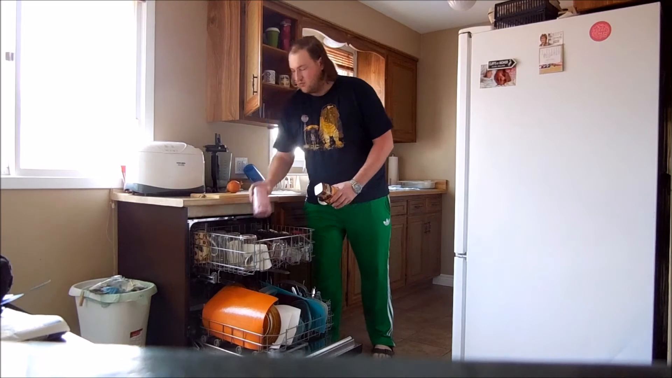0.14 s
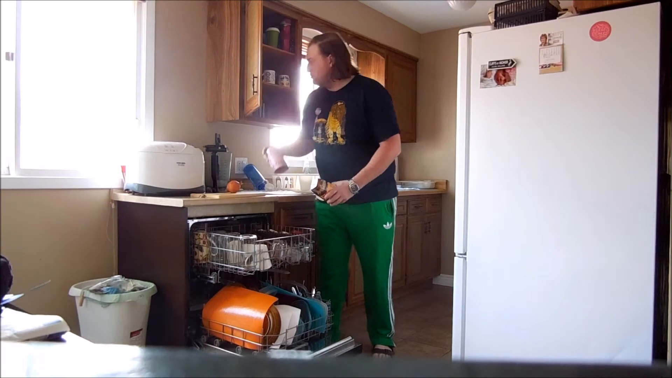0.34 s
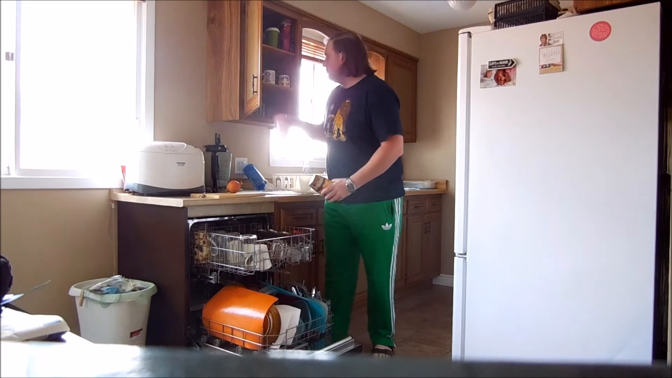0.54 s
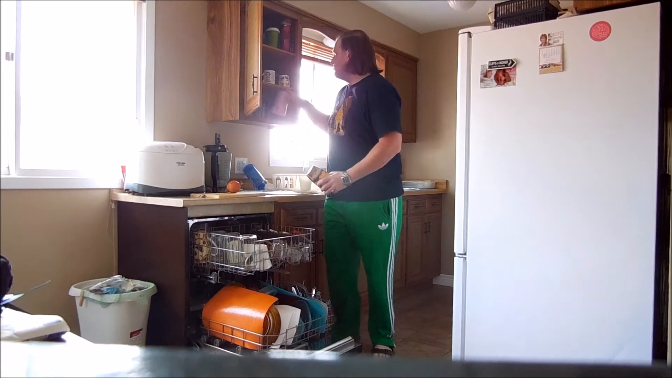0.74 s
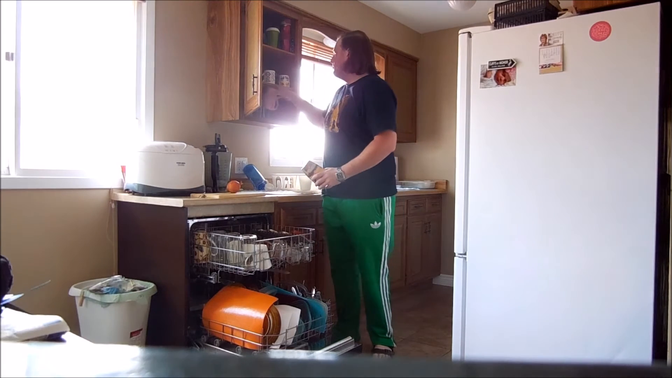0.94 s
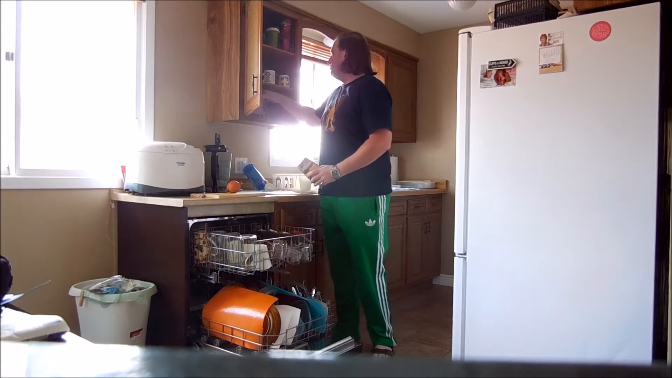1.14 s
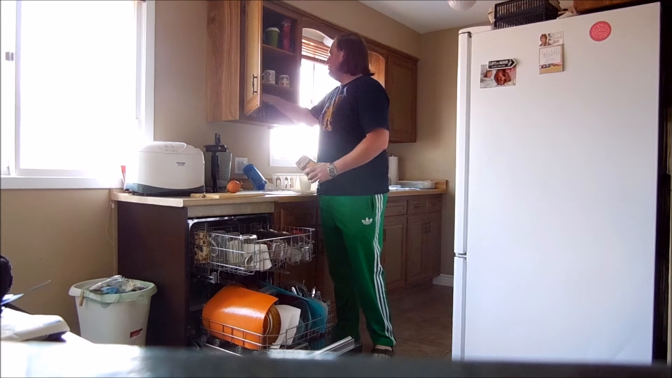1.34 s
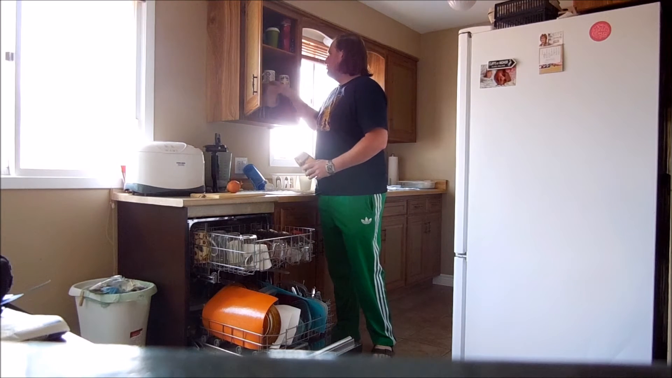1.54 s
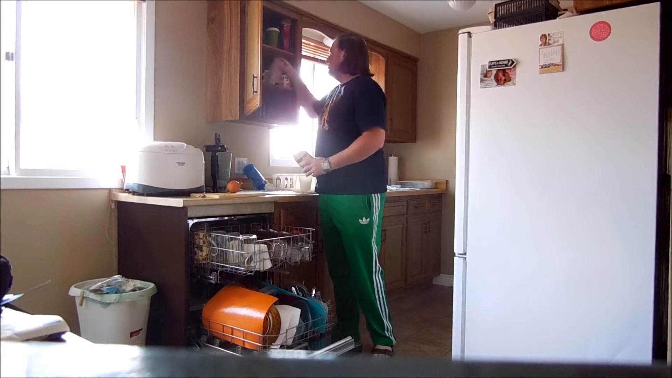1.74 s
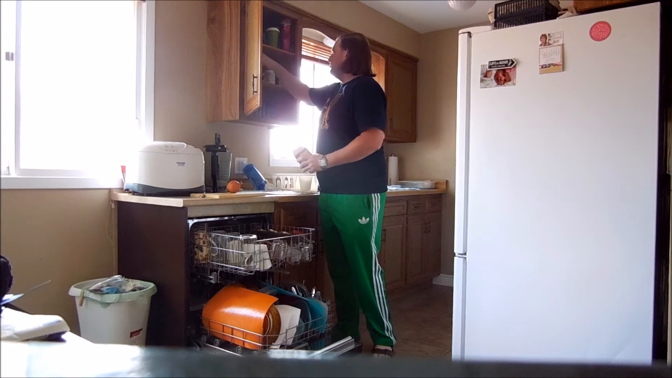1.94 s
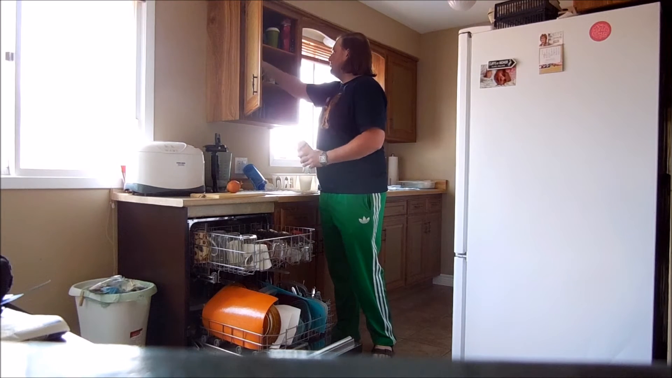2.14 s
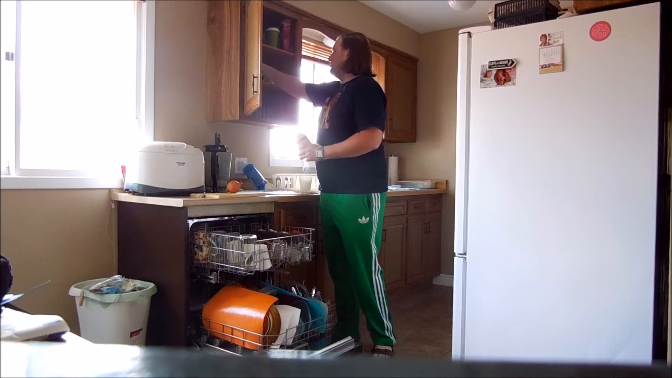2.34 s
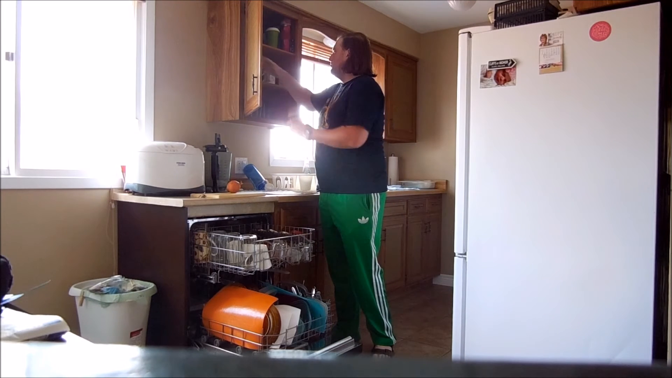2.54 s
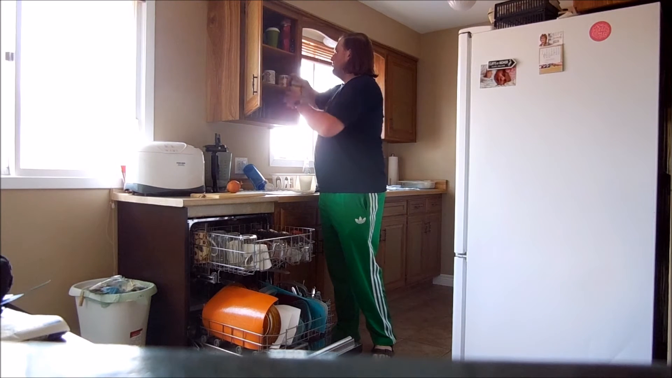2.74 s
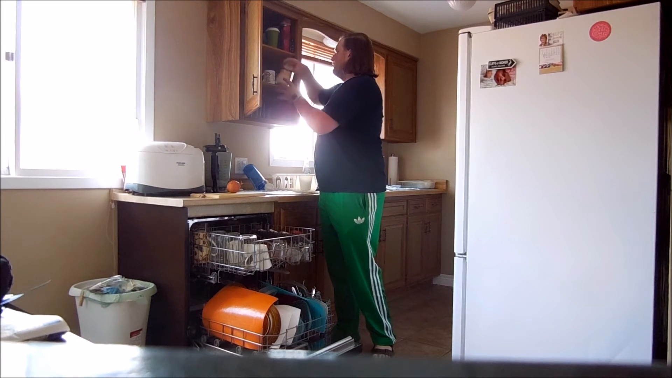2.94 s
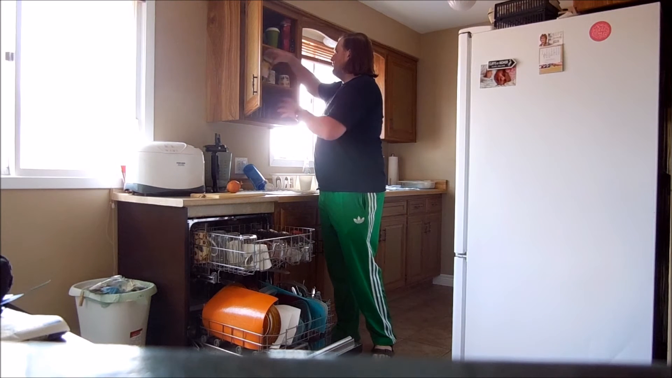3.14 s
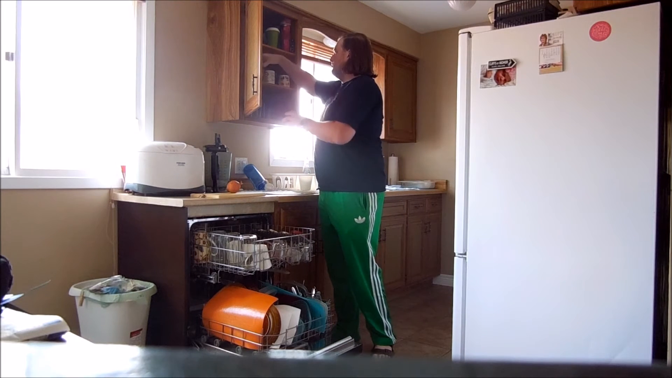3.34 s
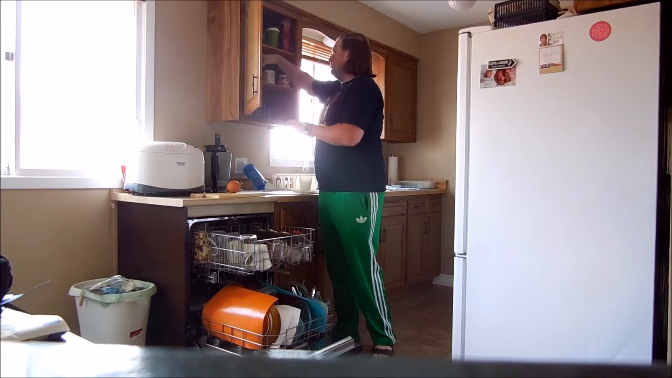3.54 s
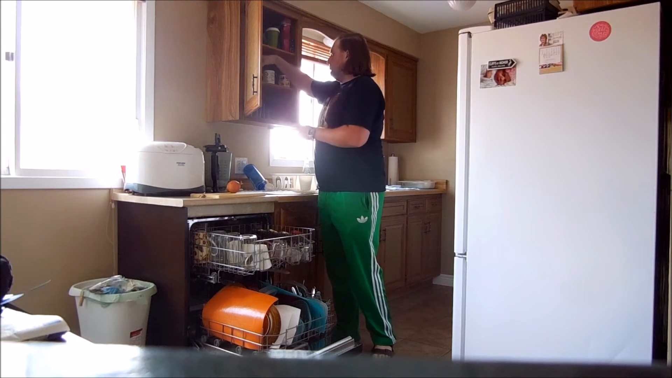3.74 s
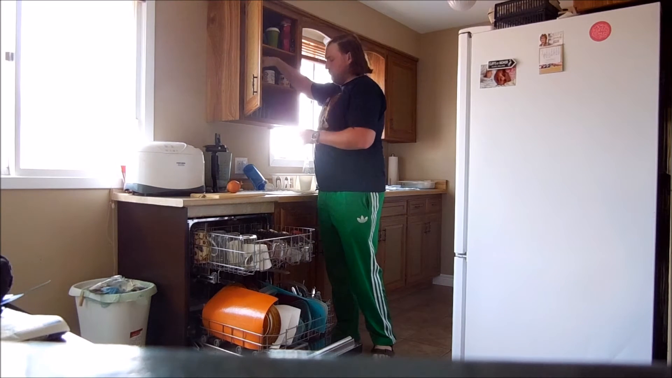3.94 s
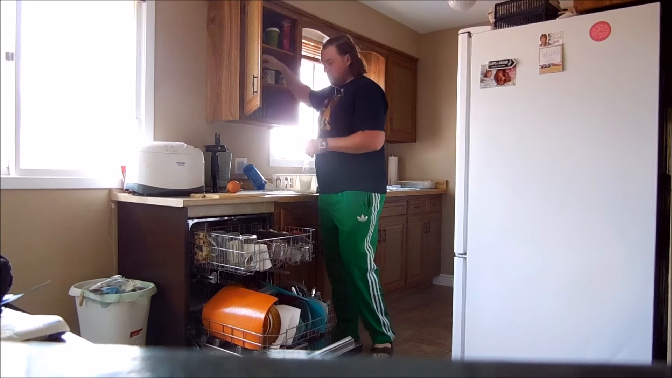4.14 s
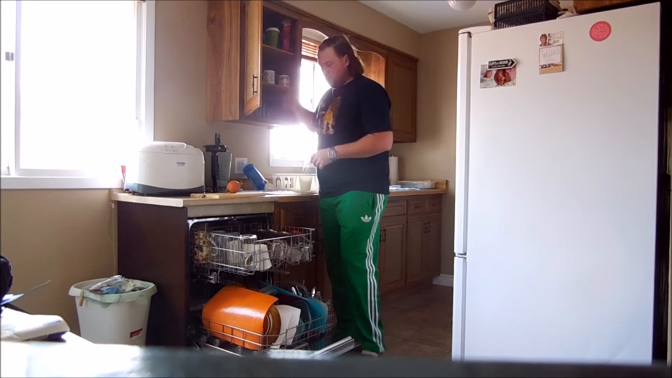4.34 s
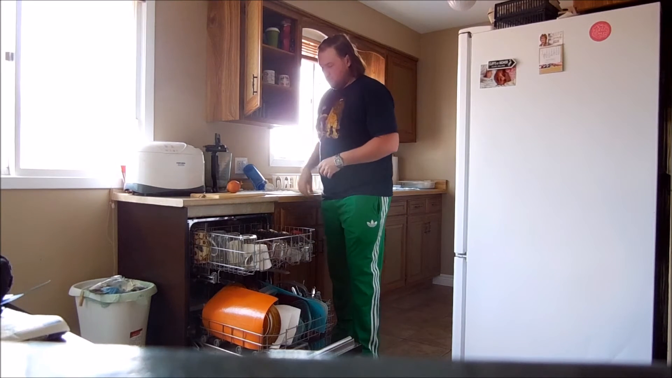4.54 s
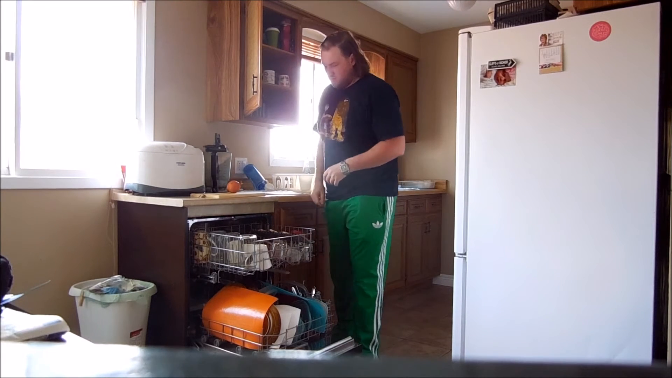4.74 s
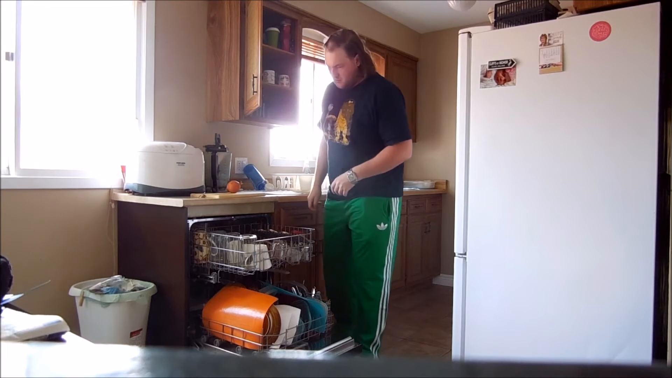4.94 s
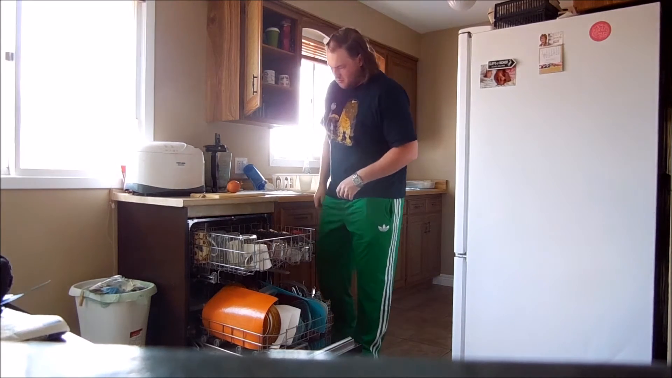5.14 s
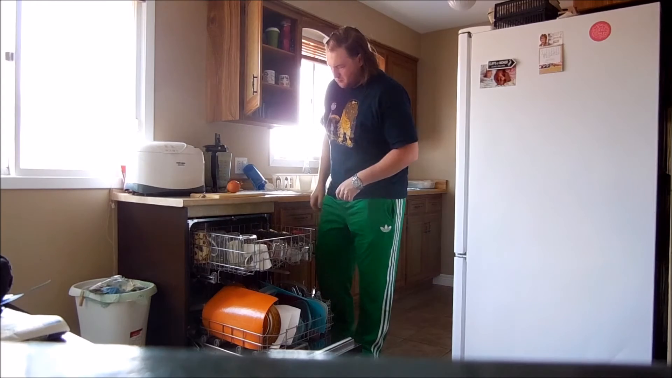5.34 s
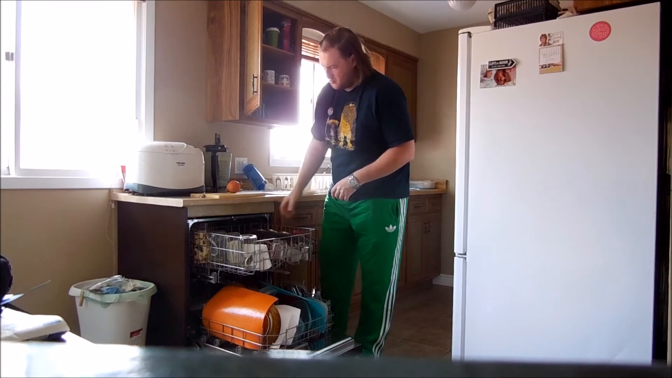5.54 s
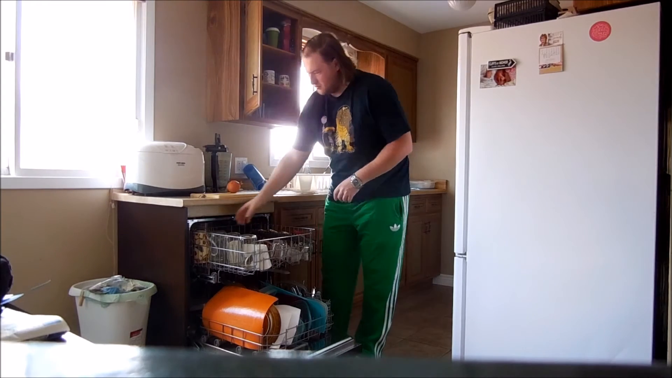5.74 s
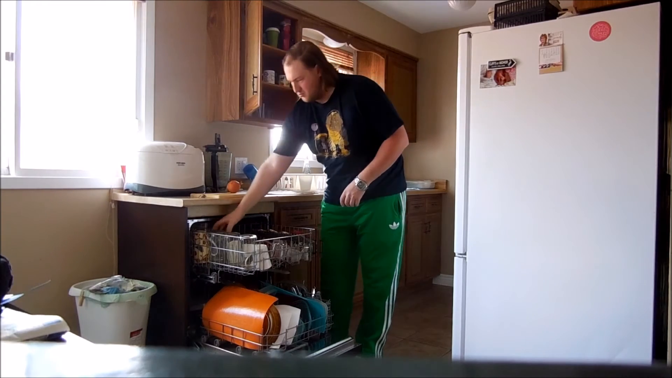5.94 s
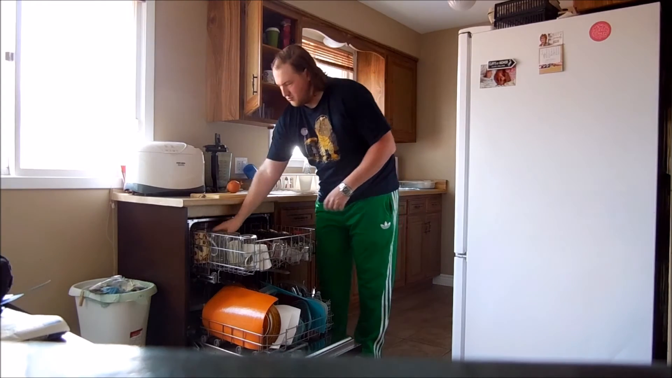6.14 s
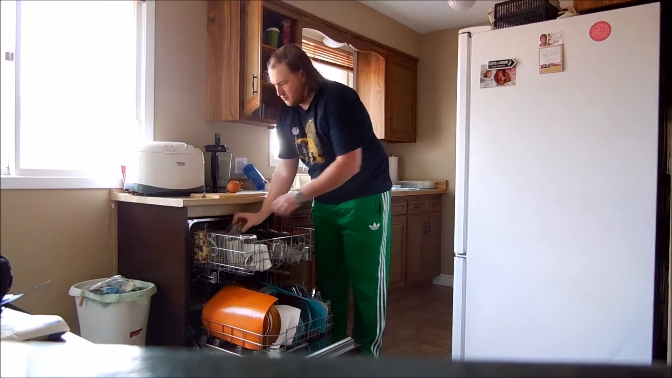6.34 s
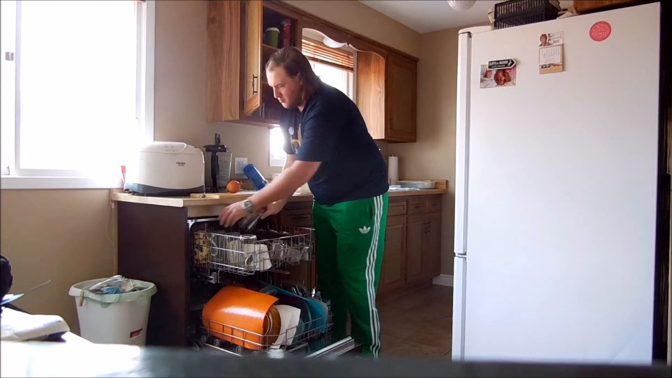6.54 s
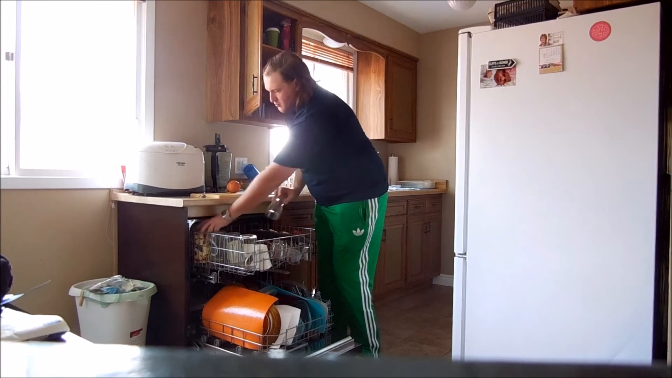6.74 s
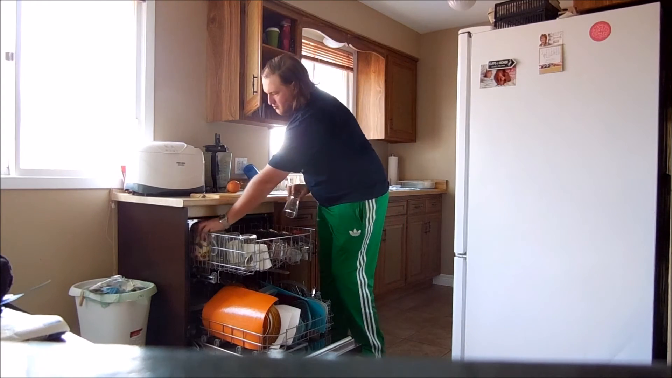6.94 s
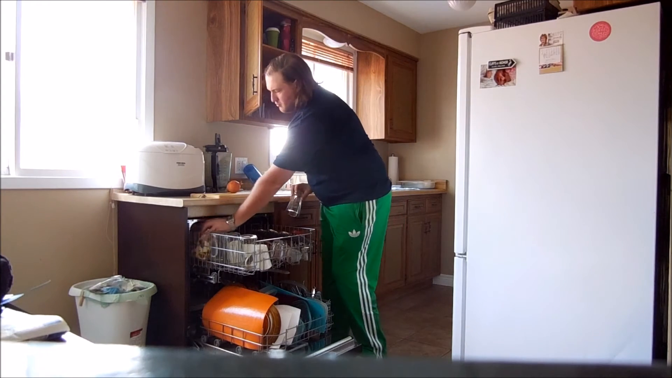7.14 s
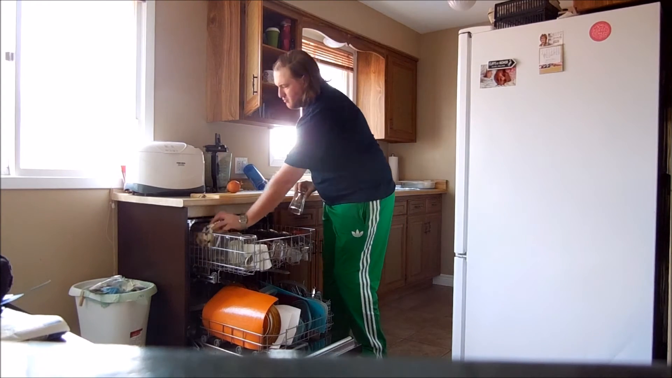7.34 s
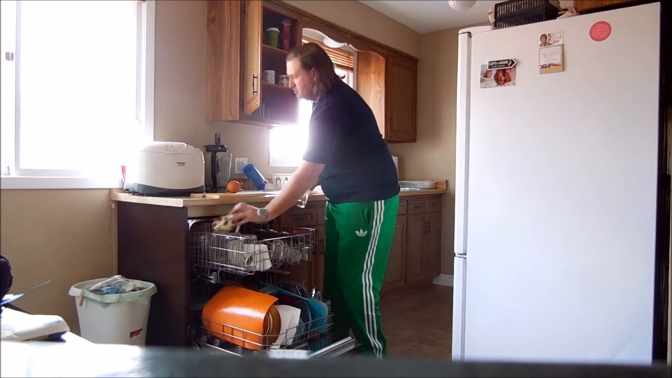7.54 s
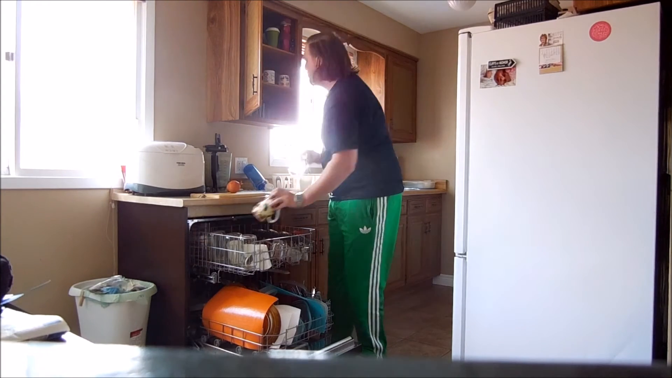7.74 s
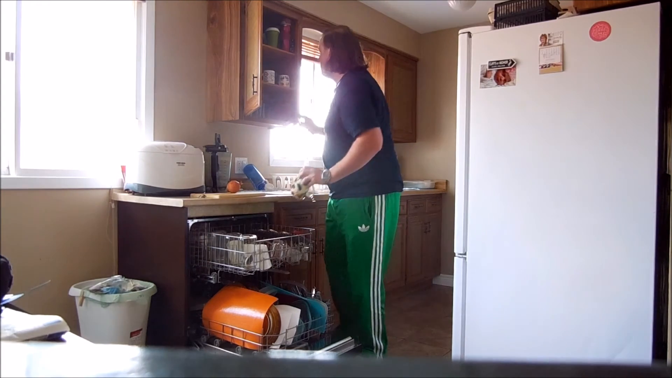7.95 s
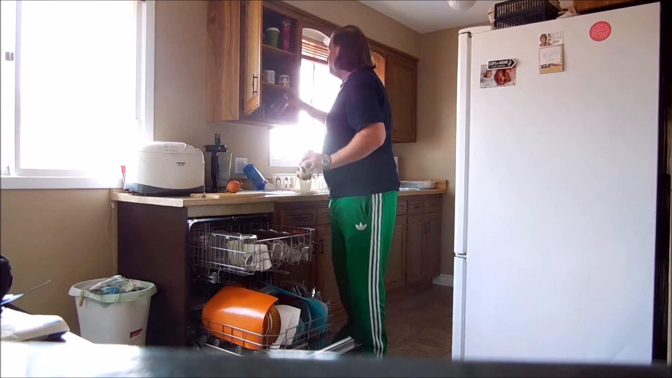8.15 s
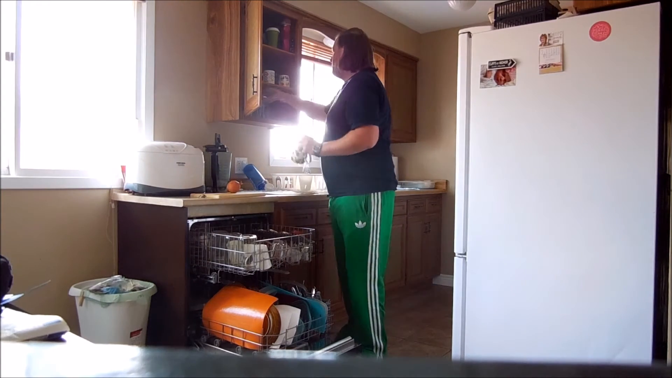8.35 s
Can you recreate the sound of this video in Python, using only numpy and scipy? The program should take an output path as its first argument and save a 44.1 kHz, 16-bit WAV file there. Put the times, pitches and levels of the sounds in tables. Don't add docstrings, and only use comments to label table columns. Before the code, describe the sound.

A small stereo camera a few metres away hears dishes put away in a hard, reflective kitchen, over faint hiss and low house hum. At 0.1 s a tumbler clinks lightly two or three times in a wire rack. Sleeves rustle from 0.6 to 1.2 s, and at 1.5 s a forearm bumps the cupboard with a dull, woody thump. A glass taps the shelf at 2.4 s, with a small clink at 2.55. At 3.5 s a big mug lands with two loud ringing knocks, then scrapes and nudges its neighbours in clinks until 4.1 s. Quiet follows, with only soft rustles and faint slides. From 6.5 s thin glass rings out brightly in quick clinks; from 7.15 to 7.9 s a small glass and mugs clink, rattle and bump hollowly against the wire. At 8.2 s a hollow mug softly touches the shelf.

```python
import sys
import numpy as np
from scipy import signal
from scipy.fft import rfft, irfft, next_fast_len
from scipy.io import wavfile
from scipy.ndimage import uniform_filter1d

SR = 44100
rng = np.random.default_rng(int(sys.argv[2]) if len(sys.argv) > 2 else 0)


def store_wav(level_fs):
    pcm = np.round(np.clip(np.atleast_2d(level_fs), -1, 1) * 32767)
    wavfile.write(sys.argv[1], SR, pcm.T.astype(np.int16))


def invert_db(x):
    u = np.asarray(x, float) / 20
    return 10 ** u


N = 370881


def at_hz(points, hz):
    table_hz, values = np.transpose(points)
    return np.interp(np.log(np.maximum(hz, 1)), np.log(table_hz), values)


def coloured(white, spectrum):
    size = next_fast_len(N)
    hz = np.arange(size // 2 + 1) * SR / size
    shaped = irfft(rfft(white, size) * invert_db(at_hz(spectrum, hz)), size)[..., :N]
    return shaped / np.sqrt(np.mean(shaped ** 2) + 1e-30)


def stereo_noise(likeness, size):
    mid, side = rfft(rng.standard_normal((2, size)))
    hz = np.arange(size // 2 + 1) * SR / size
    alike = np.clip(at_hz(likeness, hz), 0, 1)
    spectrum = np.sqrt(1 + alike) * mid + np.sqrt(1 - alike) * side * [[1], [-1]]
    return irfft(spectrum, size) / np.sqrt(2)


def envelope(rows, boom=0):
    swing_db = 30
    t, power = np.arange(N) / SR, np.zeros(N)
    for s, level_db, swell_s, fade_s, *over_db in rows:
        down = np.maximum((s - t) / swell_s, (t - s) / fade_s)
        near = down < 1.5
        power[near] += invert_db(2 * (level_db + boom * sum(over_db) - swing_db * down[near]))
    return np.sqrt(power)


def grit(per_s, spread_db, alike):
    sizes = invert_db(spread_db * np.minimum(rng.exponential(1, (2, N)), 4))
    signs = rng.choice([-1, 1], (2, N))
    mid, side = sizes * signs * (rng.random((2, N)) < per_s / SR)
    return np.sqrt(1 + alike) * mid + np.sqrt(1 - alike) * side * [[1], [-1]]


# frequency in Hz, level in dB per Hz.
HISS = [(12, -19), (20, 4), (70, -7), (200, -14), (250, -11), (330, -16.5), (6280, -23), (15600, -22),
        (16000, -37.5)]
# frequency in Hz, likeness (0 or less is unrelated, 1 the same).
HISS_LIKENESS = [(60, 0.77), (180, 0), (550, 0.17), (1650, -42.5), (4970, 0.07), (15000, 0.22)]


def room_tone():
    hiss = stereo_noise(HISS_LIKENESS, next_fast_len(N))[:, :N]
    return invert_db(-53.5) * coloured(hiss, HISS)


# loudest moment in seconds, level in dB, swell in seconds, fade in seconds.
RUSTLE = [(0.005, -62.5, .05, 0.3), (0.63, -51, .08, 0.31), (0.73, -55, 0.33, .15),
          (0.95, -50.5, 0.089, 0.26), (1.174, -56.5, .04, 0.2), (1.6, -60, 0.28, 0.67),
          (3.322, -57, 0.025, 0.072), (4.636, -51, 0.0089, 0.29), (5.06, -56.5, 0.086, 0.18),
          (5.934, -63, 0.073, 0.37), (6.336, -68, 0.64, 0.55), (7.97, -49.5, 0.44, 0.18)]
# frequency in Hz, level in dB per Hz.
CLOTH = [(710, -9), (1200, -7.5), (2000, -5.5), (2450, -7.5), (6440, -7.5), (10300, -6), (13900, -9.5),
         (16000, -29)]


def rustle():
    fibres = grit(per_s=3500, spread_db=0.5, alike=0.079)
    return invert_db(5) * envelope(RUSTLE) * coloured(fibres, CLOTH)


FIRST_TUMBLER_HZ = [433, 2109, 2172, 2684, 4157, 5402, 5676, 5783, 6649, 7114, 8150, 8640, 9041, 10076,
                    11028, 11164, 12924, 13436, 3000, 3300]
SHELVED_GLASS_HZ = [2106, 2185, 2901, 3571, 3656, 4157, 4978, 5687, 6354, 7502, 8991, 9107, 9889, 11051,
                    13210, 3210, 5318, 6650, 7640, 9506]
BIG_MUG_HZ = [1144, 2507, 2691, 3216, 3442, 3710, 4840, 5923, 6293, 7445, 7921, 8084, 8523, 8997, 9436,
              10437, 11431, 12147, 12979, 13642]
NEIGHBOURS_HZ = [2205, 2511, 2687, 3218, 3402, 3712, 4370, 4795, 7421, 9529, 11168, 12857, 3748, 9072,
                 10244, 13689]
PUSHED_ROW_HZ = [2188, 3404, 3712, 4756, 4873, 5799, 7398, 9015, 9193, 9474, 9593, 11183, 13171, 13665,
                 2209, 4839, 7445, 10296, 11945, 10702]
LAST_NUDGE_HZ = [852, 3210, 3410, 3733, 4387, 4825, 5437, 5959, 6534, 7070, 7938, 8951, 9021, 9474, 10608,
                 11451, 12494, 13688, 4063, 11929]
BRUSHED_RIMS_HZ = [2251, 4663, 7751, 9213, 10373, 10809, 11810, 12198, 12919, 14658, 14734]
THIN_TUMBLER_HZ = [2251, 3685, 4663, 6478, 7760, 7848, 8049, 9213, 10249, 7875, 10461, 11750, 11781, 12201,
                   12928, 13418, 4682, 6529, 14700, 15300]
SMALL_GLASS_HZ = [441, 1888, 2493, 3450, 3993, 6124, 6803, 7465, 8602, 9228, 12149, 12338, 13255, 13540,
                  1828, 9183, 14018, 2562]
RACK_MUG_HZ = [1917, 2437, 2473, 3395, 4352, 5199, 5363, 5981, 7628, 8034, 8197, 9735, 10716, 11413, 13049,
               13548, 3365, 5309, 6147, 15500]
HELD_MUGS_HZ = [1834, 1894, 3392, 3470, 4263, 5334, 6062, 7566, 9582, 10789, 1912]
HOLLOW_MUG_HZ = [442, 893, 1879, 1926, 4261, 4372]
# strength in dB, time to fall 60 dB in seconds.
FIRST_TUMBLER = [(-7, .3), (0.5, 0.34), (-12, 0.23), (-1, 0.38), (-11.5, 0.55), (-6, 0.16), (-22, .12),
                 (-10, 0.53), (3.5, 0.07), (-2, 0.15), (-22.5, .2), (-13, 0.18), (-28, .2), (-14, .11),
                 (4.5, 0.07), (0, .05), (-20, .14), (-13, .14), (-6, .11), (5, 0.028)]
SHELVED_GLASS = [(3.5, 0.076), (-0.5, .092), (1.5, .13), (-0.5, 0.22), (3, 0.115), (-7.5, 0.25),
                 (-10.5, .25), (-2, .41), (-9, 0.11), (1, .25), (-14, 0.13), (-6, 0.17), (-7, .15),
                 (-14, 0.11), (-8, 0.11), (-17.5, 0.1275), (-4, .25), (-10.5, .1), (-7, .16), (-13, 0.35)]
BIG_MUG = [(-7.5, 0.56), (-9, .3), (1.5, 0.31), (-18.5, 0.066), (-15.5, .28), (-5, 0.16), (-5, .2),
           (5.5, 0.05), (2, .051), (2, .076), (-10, .17), (-4.5, 0.314), (-16, .3), (4, .05), (-6, 0.12),
           (7.5, 0.103), (-8, 0.17), (-12, .5), (-17.5, .14), (7.5, 0.2)]
NEIGHBOURS = [(-3, 0.25), (-15.5, 0.74), (-9, 0.24), (-4, 0.2), (-12, .81), (-19.5, 0.26), (-22, .15),
              (-16.5, .66), (8, .075), (-6, 0.329), (-20, .34), (-17.5, .33), (-11.5, 0.72), (-4, .2),
              (-7, .15), (-15, .3)]
PUSHED_ROW = [(-2, 0.082), (2, 0.13), (-10, .26), (-25.5, .21), (-5, .19), (-6, 0.2), (-1.5, 0.087),
              (-25, .068), (-26, .14), (-14, .2), (-16, .16), (-9.5, 0.17), (-13.5, .15), (-7, .25),
              (-11.5, 0.295), (-10, .17), (-19, 0.18), (-1.5, 0.14), (-23, .15), (-14.5, 0.22)]
LAST_NUDGE = [(-8.5, .06), (3.5, 0.11), (-7.5, .1), (-2, .25), (2, 0.21), (2, 0.12), (-8, 0.33), (-8, .24),
              (-3.5, .12), (-6.5, 0.099), (-9, 0.19), (-7.5, 0.065), (-1, .072), (-7.5, .16), (2.5, 0.083),
              (-13, 0.093), (-17, 0.12), (0, .13), (-11, .15), (-7.5, .12)]
BRUSHED_RIMS = [(-6, 0.17), (-10.5, .08), (-9, .08), (-0.5, 0.061), (-7.5, .06), (3, 0.068), (-4.5, 0.072),
                (-1, .06), (-3, 0.055), (3, .08), (0, .08)]
THIN_TUMBLER = [(-4, 0.26), (-20.5, 0.14), (-3, 0.1), (0.5, 0.039), (-11, 0.39), (-8, 0.36), (-12, .3),
                (4, .027), (-8.5, 0.067), (-12, 0.25), (-21.5, .16), (-13.5, .15), (-10, 0.4), (-11, 0.067),
                (-14, .04), (-21, .2), (-12.5, .15), (-10.5, 0.099), (-11, .1), (-18, .08)]
SMALL_GLASS = [(-15, .11), (-29, .92), (-10.5, 0.051), (-27, 0.7), (-13, 0.073), (-20, .079), (-14, .15),
               (-15.5, 0.11), (-1.5, .12), (6.5, 0.069), (-13, .086), (-22, .12), (-12, .1), (-19, 0.13),
               (-33, 0.66), (-19, .12), (-29, .15), (-28, 0.4)]
RACK_MUG = [(6.5, 0.27), (-6.5, .04), (-8.5, 0.41), (8, 0.12), (-23, 0.39), (-8, 0.16), (7, 0.22),
            (-14, .3), (-7, .18), (-15, .19), (-7, .22), (-17, 0.28), (5, .05), (0, .12), (-12, .17),
            (-14, .096), (-1.5, 0.32), (-7, 0.17), (-20, .15), (-9.5, 0.23)]
HELD_MUGS = [(-1, .2), (-3.5, 0.43), (-7, .2), (1, 0.16), (-3.5, 0.1), (-6, 0.098), (-17, .1), (-4, .14),
             (-13, .1), (-0.5, .1), (-4.5, 0.46)]
HOLLOW_MUG = [(-3, 0.61), (-19, 0.11), (-20.5, 0.35), (-23.5, 0.084), (-11.5, 0.035), (-34, 0.089)]
# resonance in Hz, width in Hz, level in dB.
RACK = [(455, 45, -2), (1170, 4500, -47), (2710, 150, 10), (6430, 1000, -26)]
SHELF = [(130, 37, -7.5), (278, 140, -3), (461, 360, -2), (627, 200, 2.5), (944, 220, -1), (1400, 235, -2),
         (2090, 1070, -10), (3120, 3300, -20.5)]
CORNER = [(146.6, 60, -9.5), (242.4, 50, -4), (547, 51, 1.5), (692, 49, 4), (884, 203, -1), (1325, 400, -2),
          (2030, 390, -5), (3015, 1200, -10.5)]
# start in seconds, ring in dB, thump in dB over the ring, crack in dB over the ring,
# time the ring takes to swell in milliseconds.
KNOCKS = [ (FIRST_TUMBLER_HZ, FIRST_TUMBLER, RACK, [(.092, -23, -23.5, -4, 1.2), (.165, -25.5, -6, -9, 7.7),
          (.205, -29.5, -8.5, -24, 13)]),
          (SHELVED_GLASS_HZ, SHELVED_GLASS, SHELF, [(2.397, -56.5, 39.5, 14.5, 1.1),
          (2.403, -45.5, 40.5, 11, 1.1), (2.412, -47, 38.5, 9, 1.1), (2.553, -19, -27, -6, 3.3)]),
          (BIG_MUG_HZ, BIG_MUG, CORNER, [(3.464, -6.5, 1.5, -8.5, 2.2), (3.562, -10.5, -1, -5.5, 2)]),
          (NEIGHBOURS_HZ, NEIGHBOURS, SHELF, [(3.324, -73, -4, -6, 1.1), (3.71, -11.5, -36, -10, 7.9)]),
          (PUSHED_ROW_HZ, PUSHED_ROW, CORNER, [(3.877, -22.5, 5, 1, 4), (3.897, -24, 12.5, -6, 4.4),
          (3.889, -13, -14.5, -8.5, 2.5), (3.905, -11, -3, -14, 6.8)]),
          (LAST_NUDGE_HZ, LAST_NUDGE, SHELF, [(4.107, -19, 0, -7.5, 1.9), (4.636, -66, -6, 13, 1.2)]),
          (THIN_TUMBLER_HZ, THIN_TUMBLER, RACK, [(6.5445, -2.5, -26.5, -20.5, 5.8),
          (6.564, -29, -33.5, -35, 9.2), (6.598, -3, -38, -18.5, 4.5), (6.638, -13.5, -16, -15, 1.3)]),
          (SMALL_GLASS_HZ, SMALL_GLASS, RACK, [(7.141, -36, -3, 1.5, 1.1), (7.148, -4, -40, -20.5, 2.6),
          (7.164, -13, -39, -22, 2.7), (7.2, -12.5, -31, -10.5, 4.4), (7.25, -33.5, 3.5, -7, 4.2),
          (7.286, -41, 5, 0, 4), (7.31, -45, -2, 0.5, 3)]),
          (BRUSHED_RIMS_HZ, BRUSHED_RIMS, RACK, [(6.494, -14.5, -29.5, -11, 2.2),
          (6.507, -18, -28, -11.5, 3), (6.522, -34, -34.5, -15, 3)]),
          (RACK_MUG_HZ, RACK_MUG, RACK, [(7.3855, -15, -27, -13, 2.7), (7.403, -20, -40, -9, 18),
          (7.555, -48, 5, 7.5, 3), (7.575, -60, -11, -19, 5.6)]),
          (HELD_MUGS_HZ, HELD_MUGS, RACK, [(7.68, -36.5, -20, -13, 3.8), (7.7705, -29, -19, -11, 2.5),
          (7.805, -33.5, -30, -23, 3.7), (7.91, -44, -6, -32, 3.8)]),
          (HOLLOW_MUG_HZ, HOLLOW_MUG, SHELF, [(8.178, -19.5, -23, -25, 3.4), (8.243, -38.5, -31, -7, 15)]),
          ]


def glass_rings():
    chip_t60_s, air_t60_s = 0.018, 0.075
    touch_s = 0.0006
    out, t = np.zeros(N + SR), np.arange(SR * 2 // 3) / SR
    onset = 1 - np.exp(-(t / touch_s) ** 2)
    for pitches_hz, modes, _, knocks in KNOCKS:
        hz = np.array(pitches_hz)[:, None]
        level_db, t60 = np.transpose(modes)[:, :, None]
        longest_s = np.where(hz < 800, air_t60_s, 0.7)
        fall_db = -60 * t / np.clip(t60, 0.03, longest_s)
        tone = np.sin(2 * np.pi * hz * t)
        split = rng.uniform(0.0005, 0.003, (20, 1))[:len(hz)]
        partner = invert_db(-9) * np.sin(2 * np.pi * hz * (1 - split) * t)
        free = invert_db(level_db + fall_db + 1) * (tone + partner)
        choked = invert_db(level_db / 2 + 15 - 60 * t / chip_t60_s) * tone
        lucks = rng.standard_normal((4, 20))[:, :len(hz)]
        for k, (s, ring_db, _, crack_db, swell_ms) in enumerate(knocks):
            luck = lucks[k % 4]
            swell = 1 - np.exp(-(1000 * t / swell_ms) ** 2)
            ring = invert_db(1.04 * luck) @ free * swell
            chip = invert_db(crack_db) * np.sign(luck) @ choked
            out[round(s * SR):][:len(t)] += invert_db(ring_db - 5) * (ring + chip) * onset
    return out[:N]


def resonate(blows, body):
    out = 0
    for k, (hz, width, level_db) in enumerate(body):
        r = np.exp(-np.pi * np.clip(width, 20, 3000) / SR)
        feedback = [1, -2 * r * np.cos(2 * np.pi * hz / SR), r * r]
        feed = np.array([1, 0, -1]) * (1 - r * r) / 2
        out = out + (-1) ** k * invert_db(level_db) * signal.lfilter(feed, feedback, blows)
    return out


# resonance in Hz, width in Hz, level in dB.
PANEL = [(201, 25, 3), (352, 35, -3), (610, 53, -4.5), (840, 42, -8), (1200, 110, -14)]
# resonance in Hz, width in Hz, level in dB.
HOLLOW = [(141, 28, -7), (448, 15, -0.5), (792, 55, -6), (1080, 53, -10.5), (1360, 88, -4.5),
          (1610, 54, -7.5)]
# start in seconds, level in dB.
LEANS = [
    (1.517, -4),
    (1.546, 6),
    (1.56, -4),
    (1.577, -4),
    (1.599, -5),
    (1.645, -17),
]
# start in seconds, level in dB.
BUMPS = [(7.153, -37.5), (7.252, -44), (7.28, -26.5), (7.296, -26), (7.331, -28), (7.35, -24), (7.398, -30),
         (7.432, -31), (7.461, -35), (7.534, -30), (7.655, -36), (7.79, -32), (7.846, -46)]


def contacts():
    bodies = [SHELF, CORNER, RACK, PANEL, HOLLOW]
    blows, cracks = np.full((len(bodies), N), 1e-18), np.full(N, 1e-18)
    for _, _, body, knocks in KNOCKS:
        for s, ring_db, thump_db, crack_db, _ in knocks:
            blows[bodies.index(body), round(s * SR)] = invert_db(ring_db + thump_db + 41.5)
            cracks[round(s * SR)] = invert_db(ring_db + crack_db + 10)
    for s, level_db in LEANS:
        blows[bodies.index(PANEL), round(s * SR)] = invert_db(level_db + 11.5)
    for s, level_db in BUMPS:
        blows[bodies.index(HOLLOW), round(s * SR)] = invert_db(level_db + 46)
    fade = np.exp(-1 / (0.013 * SR))
    crack = signal.lfilter([1], [1, -fade], cracks) * rng.standard_normal(N)
    crack = signal.sosfilt(signal.butter(2, [900, 12500], "band", fs=SR, output="sos"), crack)
    thump = sum(resonate(blow, body) for blow, body in zip(blows, bodies))
    return signal.sosfilt(signal.butter(2, 120, "high", fs=SR, output="sos"), thump) + crack


# loudest moment in seconds, drag in dB,
# swell in seconds, fade in seconds, floor boom in dB over the drag.
SLIDES = [(0.94, -43.5, 0.038, 0.19, 0), (1.172, -56.5, .05, 0.18, -7), (1.52, -41.5, 0.022, 0.19, -3),
          (1.575, -39.5, 0.15, 0.18, 1.5), (3.502, -29.5, 0.037, 0.13, 5), (3.6, -25.5, 0.1, 0.44, -22),
          (3.89, -31.5, 0.059, 0.19, -10), (3.938, -19, 0.11, 0.086, -33), (4.652, -60, 0.032, 0.12, 13),
          (5.048, -56, 0.055, 0.19, -31), (5.938, -55.5, 0.072, 0.33, 0), (6.59, -46, 0.073, 0.74, 0),
          (6.83, -60, 0.075, .3, 5), (7.156, -36, 0.11, 0.74, -7), (7.29, -28, 0.12, 0.21, -7.5),
          (7.55, -36.5, 0.28, 0.12, -32), (7.68, -47, 0.16, 0.6, 0), (7.8, -38.5, 0.099, 0.18, -5.5),
          (7.988, -44.5, 0.49, 0.13, -15), (8.19, -42.5, 0.014, 0.31, -1.5), (8.264, -48.5, 0.14, 0.16, 5)]
# frequency in Hz, level in dB per Hz.
DRAG = [(170, -56), (280, -9.5), (400, 2.5), (620, 0), (1000, -1.5), (1500, -16), (4000, -31), (9000, -72)]
# frequency in Hz, level in dB per Hz.
BOOM = [(35, -8.5), (75, -12.5), (135, -1), (205, -10), (270, -8), (500, -39)]


def slides():
    slips = grit(per_s=1500, spread_db=1.5, alike=0.9)
    drag = envelope(SLIDES) * coloured(slips, DRAG)
    boom = envelope(SLIDES, boom=0.85) * coloured(slips, BOOM)
    return invert_db(-6) * drag + invert_db(-4) * boom


# frequency in Hz, time to fall 60 dB in seconds.
ROOM_T60 = [(100, 0.63), (500, 0.6), (2000, 0.6), (6000, 0.54), (14000, 0.36)]
# frequency in Hz, likeness from 0 to 1.
ROOM_LIKENESS = [(100, 1), (600, 0.94), (1200, 0.53), (2500, 0.085), (6000, 0.018), (14000, 0.14)]


def kitchen(x, direct_db):
    first_wall_s, build_s = 0.00054, 0.0037
    t, noise, tail = np.arange(SR) / SR, stereo_noise(ROOM_LIKENESS, SR), 0
    edges = 60 * 2 ** np.arange(0, 8.6, 0.5)
    for low, high in zip(edges, edges[1:]):
        band = signal.sosfilt(signal.butter(2, [low, high], "band", fs=SR, output="sos"), noise)
        t60 = at_hz(ROOM_T60, np.sqrt(low * high))
        tail = tail + band * invert_db(-60 * t / t60) / np.sqrt(t60)
    late = np.maximum(t - first_wall_s, 0)
    tail = tail * (1 - np.exp(-late / build_s))
    tail = tail / np.sqrt(np.sum(tail ** 2) / 2)
    tail[:, 0] = invert_db(direct_db)
    return signal.fftconvolve(x[None], tail, axes=1)[:, :N]


def scene():
    rubbing = slides() + rustle()
    rings = glass_rings()
    struck = signal.sosfilt(signal.butter(3, 110, "high", fs=SR, output="sos"), rings + contacts())
    in_room = kitchen(struck + invert_db(-12) * rubbing[0], direct_db=-18)
    direct_db = np.array([[-15], [-13]])
    return in_room + invert_db(direct_db) * rings + rubbing


# start in seconds, step in dB, creep back in seconds.
DUCKS = [
    (2.415, -6, 0.14),
    (3.459, -4.5, 0.071),
    (3.65, -5.5, 0.19),
    (3.97, -7.5, .15),
    (6.536, 5, 0.069),
    (6.657, 0, 0.041),
    (6.688, -6.5, 0.26),
    (7.21, -8.5, 0.092),
    (7.375, 0.5, 0.075),
]


def gain_control():
    t, step_s, gain_db = np.arange(N) / SR, 0.011, 0
    for s, step_db, back_s in DUCKS:
        gain_db = gain_db + np.interp(t, [s, s + step_s, s + step_s + back_s], [0, step_db, 0])
    return gain_db


# start in seconds, end in seconds, lowest Hz, highest Hz.
STARVED = [(.105, .24, 4450, 5000), (2.59, 2.71, 10250, 10500), (3.48, 3.7, 5060, 5300),
           (3.56, 3.79, 3950, 4250), (3.53, 3.66, 9800, 10050), (3.55, 3.69, 10900, 11100),
           (3.93, 4.09, 5100, 5450), (4.17, 4.27, 9850, 10150), (6.505, 6.75, 6950, 7450),
           (6.6, 6.68, 10700, 11100), (7.78, 7.84, 6350, 6800), (7.16, 7.26, 1600, 1720),
           (7.41, 7.47, 6900, 7200), (.105, .24, 7650, 7900), (.105, .19, 10350, 10650),
           (.105, .22, 11750, 12200), (7.41, 7.54, 4500, 4750), (3.74, 3.85, 4500, 4700),
           (3.9, 4.05, 8700, 8850), (4.12, 4.22, 9650, 9850), (2.57, 2.68, 7000, 7200)]


def starve(x):
    out = x.copy()
    for start, end, low, high in STARVED:
        span = slice(round((start - 0.015) * SR), round((end + 0.015) * SR))
        band_pass = signal.butter(3, [low, high], "band", fs=SR, output="sos")
        band = signal.sosfiltfilt(band_pass, x[:, span])
        out[:, span] -= band * signal.windows.tukey(band.shape[1], 0.05 / (end - start + 0.03))
    return out


# start in seconds, end in seconds.
TOP_KEPT = [(3.71, 3.75), (3.855, 3.99), (4.1, 4.14), (6.49, 6.625), (7.26, 7.39), (7.41, 7.49),
            (7.52, 7.58)]


def lose_treble(x):
    top_edge_hz, loud_db = 14300, -41
    power = np.mean(x ** 2, axis=0)
    behind = uniform_filter1d(power, size=512, origin=255)
    ahead = uniform_filter1d(power, size=512, origin=-256)

    top = x - signal.sosfiltfilt(signal.cheby2(12, 50, top_edge_hz, fs=SR, output="sos"), x)
    t = np.arange(N) / SR
    kept = sum((t > start) & (t < end) for start, end in TOP_KEPT)
    is_loud = np.roll(behind, 600) > invert_db(2 * loud_db)
    x = x - 0.97 * top * uniform_filter1d(is_loud * (1 - 0.45 * kept), size=512)

    treble = signal.sosfiltfilt(signal.butter(2, 600, "high", fs=SR, output="sos"), x)
    knock_coming = ahead > 60 * np.roll(behind, -90)
    return x - treble * uniform_filter1d(1.0 * knock_coming, size=64)


def band_limit(x):
    return signal.sosfilt(signal.butter(12, 16480, fs=SR, output="sos"), x)


def record(dry):
    gain_db = gain_control()
    x = dry * invert_db(gain_db) + room_tone() * invert_db(np.minimum(gain_db, 0))
    x = 0.8 * np.tanh(x / 0.8)
    mix = starve(lose_treble(x))
    return band_limit(mix)


dry = scene()
out = record(dry)
store_wav(out)
```